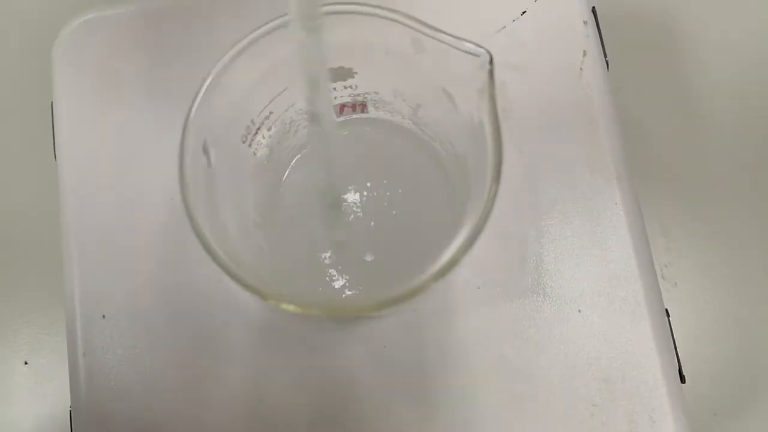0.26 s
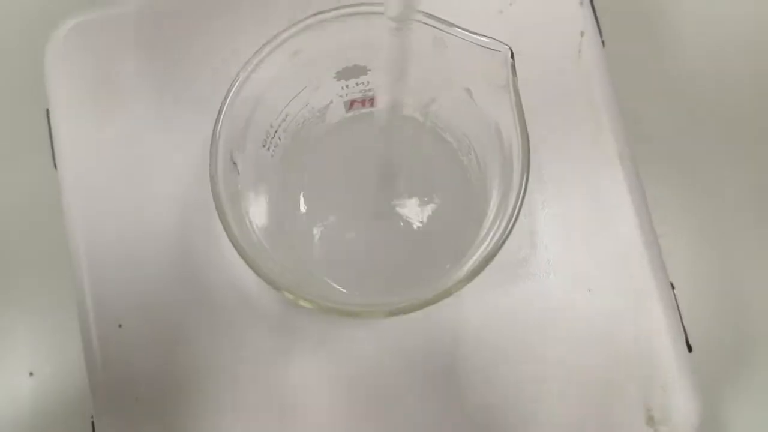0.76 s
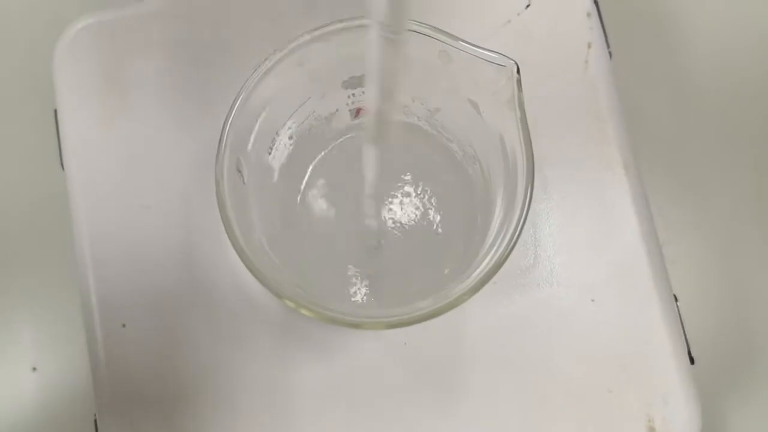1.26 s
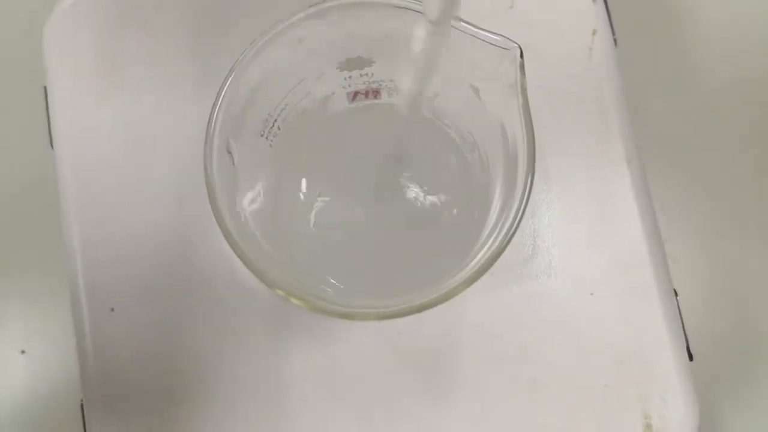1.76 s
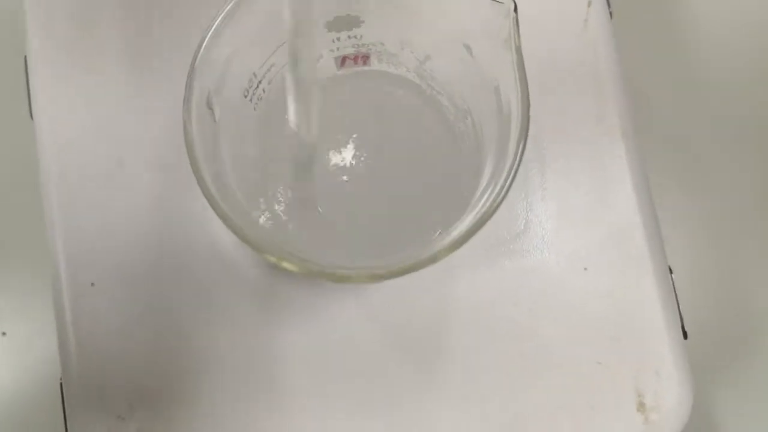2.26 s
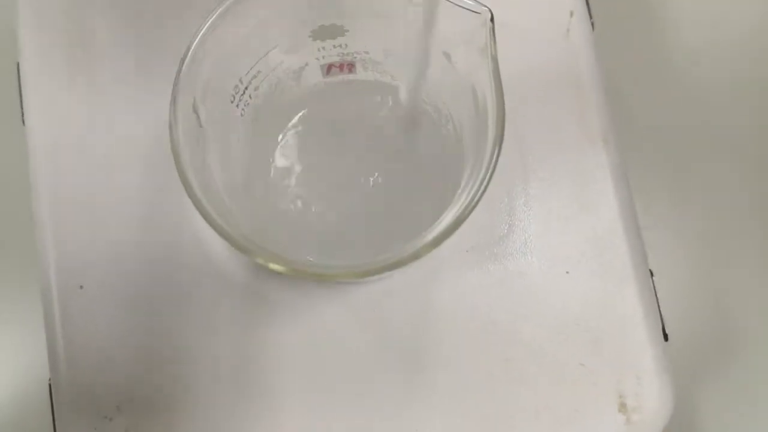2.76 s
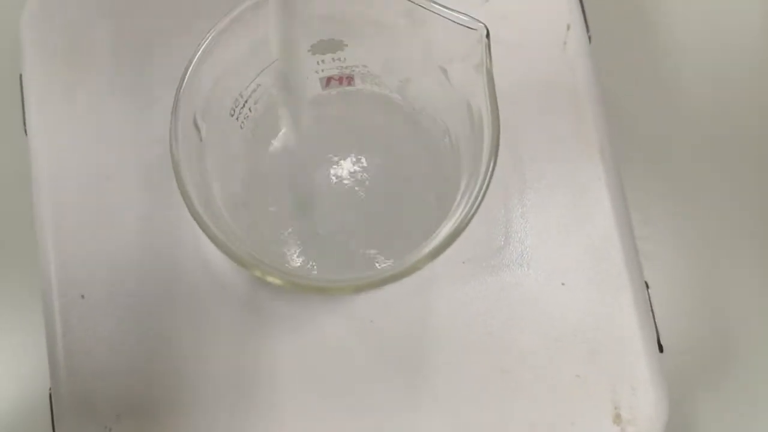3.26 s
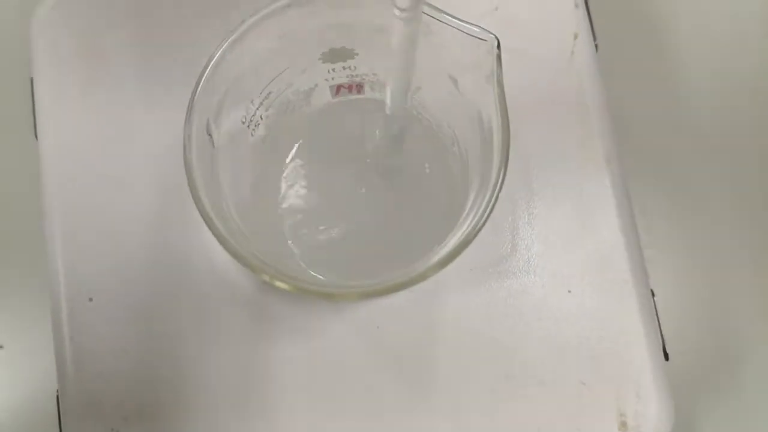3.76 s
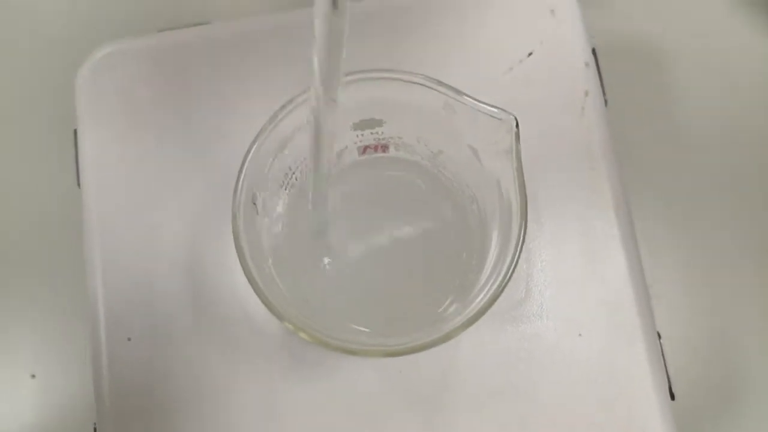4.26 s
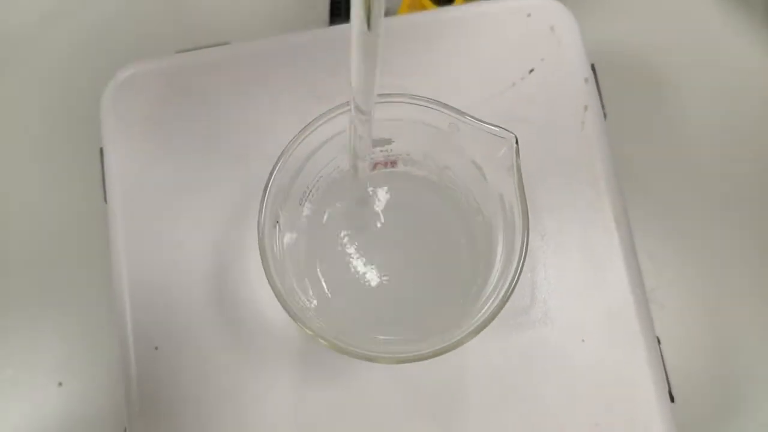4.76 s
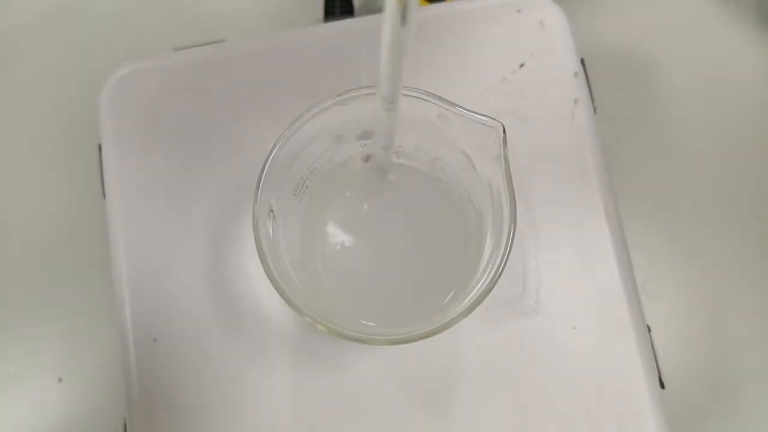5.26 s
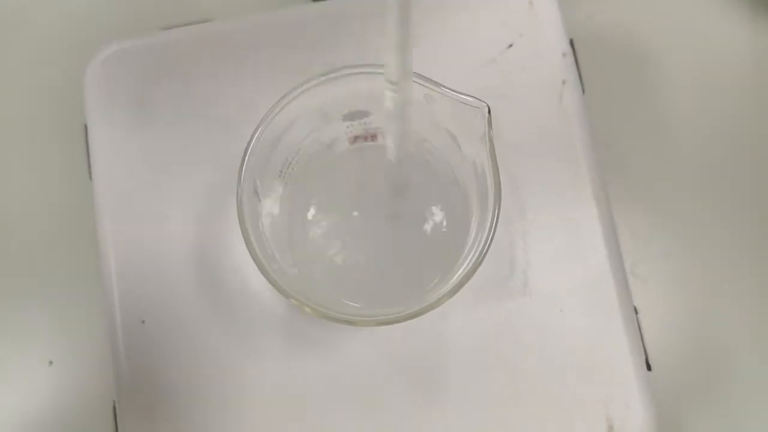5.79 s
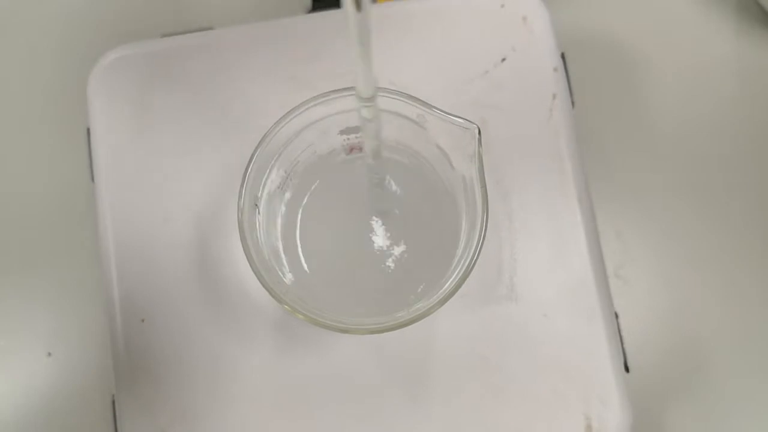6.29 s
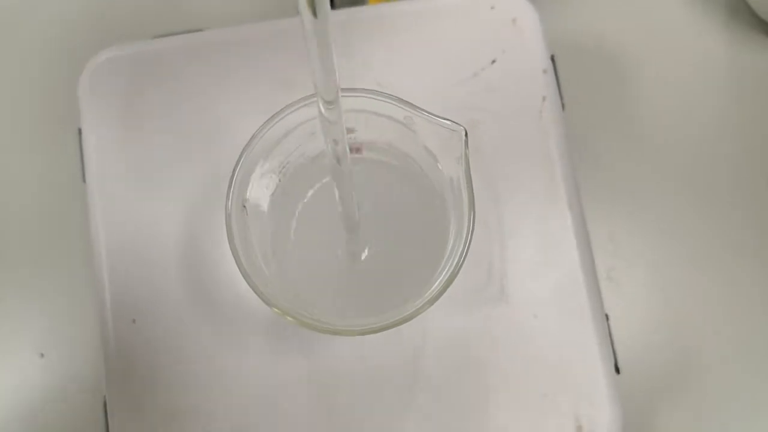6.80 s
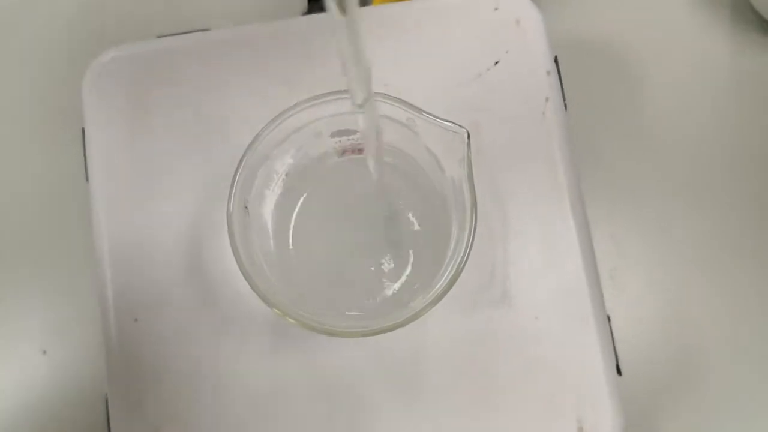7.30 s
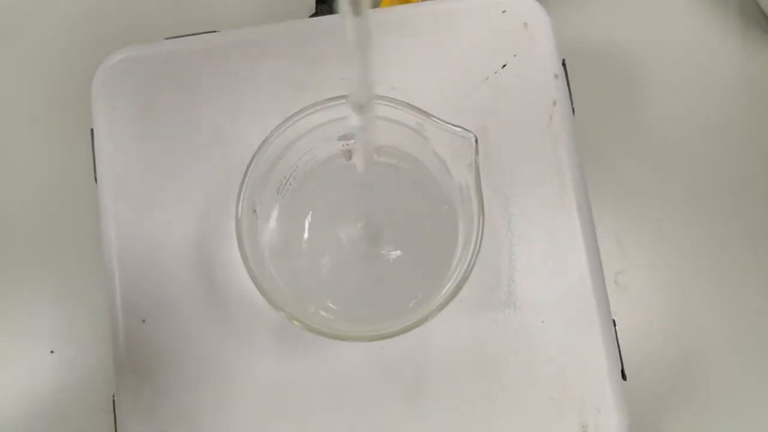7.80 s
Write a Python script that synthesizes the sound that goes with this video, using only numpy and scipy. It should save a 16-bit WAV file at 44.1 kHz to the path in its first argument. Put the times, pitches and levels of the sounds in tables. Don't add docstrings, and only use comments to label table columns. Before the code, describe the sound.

A steady low electrical hum, with rumble and a soft fan rush, runs throughout in a small hard room. Close to a hand-held phone, a glass rod stirs water in a glass beaker. At 0.34 s comes a loud, bright clink with a tiny bounce and short ring, followed by faint ticks and taps. Around 1.3 s there are light gritty strokes, then a hard, stuttering skid at 1.5 s. Small tinks follow until a softer clink at 3.06 s rings a little longer and bounces. A very short scrape chatters near 3.8 s. Another strong clink with quick bounces hits at 4.6 s; light touches continue. A medium clink sounds at 6.26 s, a longer grating skid runs from 6.7 to 6.8 s, and a sharp loud clink lands at 7.65 s. Faint dull taps end it near 8 s, the hum unchanged.

```python
import sys
import numpy as np
from scipy import signal
from scipy.fft import rfft, irfft, next_fast_len
from scipy.io import wavfile
from scipy.ndimage import uniform_filter1d, map_coordinates

SR = 44100
rng = np.random.default_rng(int(sys.argv[2]) if len(sys.argv) > 2 else 0)


def dump(signal):
    limited = np.clip(np.atleast_2d(signal).T, -1, 1)
    pcm = np.round(limited * 32767).astype(np.int16)
    wavfile.write(sys.argv[1], SR, pcm)


def linear_from_db(decibels):
    return 10 ** (np.asarray(decibels, float) / 20)


N = 354563

# [f/Hz, level/dB, time to fall 60 dB/s]
GLASS = [(1159, 6, 0.012), (1557, -0.5, 0.03), (1800, 4.5, 0.015), (2095, -3, 0.026), (2335, -2, 0.022),
         (2450, -14.5, 0.013), (2900, -1.5, 0.012), (3390, -5.5, 0.009), (3650, -17, 0.022),
         (3976, -5.5, 0.025), (4540, -6, 0.016), (5300, -18.5, 0.017), (5400, -24, 0.01), (6040, -6, 0.028),
         (6440, 1, 0.025), (7136, -6.5, 0.021), (7320, -4.5, 0.018), (7930, 0.5, 0.011),
         (8400, -4.5, 0.019), (9200, -5.5, 0.0059), (9560, 7, 0.0072), (10800, -23, 0.0045),
         (12500, -13.5, 0.0055), (13820, -7, 0.0098), (14860, -12.5, .01)]


def unit(x):
    return x / np.sqrt(np.mean(x ** 2) + 1e-20)


def along(points, hz):
    f, v = np.transpose(points)
    return np.interp(np.log(hz + 1), np.log(f + 1), v)


def latest(rows, s):
    return [row[1:] for row in rows if row[0] < s][-1]


def wobble(rate, size=N):
    knots = rng.standard_normal(int(size * rate / SR) + 4)
    return map_coordinates(knots, [np.arange(size) * rate / SR])


def filtered(x, response):
    m = next_fast_len(N + SR // 2)
    return irfft(rfft(x, m) * response(np.fft.rfftfreq(m, 1 / SR)), m)[..., :N]


def resonances(modes):
    def response(f):
        total = 0
        for k, (centre, width, db) in enumerate(modes):
            total = total + (-1) ** k * linear_from_db(db) * 1j * f * width / (centre ** 2 - f * f + 1j * f * width)
        return total
    return response


def unit_gain(response):
    return np.sqrt(np.mean(abs(response(np.arange(0, SR / 2))) ** 2))


def rush(spectrum):
    # [f/Hz, likeness from -1 to 1]
    alike = [(40, 1), (100, 0.99), (230, 0.93), (400, -0.12), (700, -0.45), (1200, 0.013), (2000, -0.047)]

    def middle_and_side(hz):
        turn = np.arccos(np.clip(along(alike, hz), -1, 1)) / 2
        return linear_from_db(along(spectrum, hz)) * [np.cos(turn), np.sin(turn)]
    mid, side = filtered(rng.standard_normal((2, N)), middle_and_side)
    return unit(np.array([mid + side, mid - side]))


def machines():
    hum_hz = [200.158, 100.08, 194.9, 205.4, 176.2, 224.1, 24, 248, 276]
    hum_db = [0, -27, -20, -29, -26, -17, -30, -35, -34]
    # [f/Hz, level/dB]
    whines = [(403.7, -80), (710.6, -70.5), (812.9, -76.5), (904.4, -70), (1174, -68), (1427, -74.5),
              (1712, -73), (2848, -75)]
    # [f/Hz, width/Hz, level/dB]
    housing = [(877, 82, -3), (1180, 64, 0), (1770, 90, -3.5), (2060, 80, -5.5), (2480, 140, -3.5)]
    # [f/Hz, level per Hz/dB]
    rumble = [(15, -23.5), (36, -3.5), (43, -32.5), (55, -0.5), (68, -5), (76, -24.5), (87, -18),
              (100, -17), (113, -18), (123, -8), (146, -9), (165, -7), (190, -24), (216, -10.5),
              (240, -24.5), (300, -72)]
    # [f/Hz, level per Hz/dB]
    fan = [(140, -39.5), (235, -3.5), (276, 0), (327, -6), (461, -9.5), (664, -14), (687, -16),
           (874, -11.5), (1350, -14.5), (1750, -13), (2830, -18), (3600, -28.5), (4680, -56.5),
           (7920, -120)]
    # [f/Hz, level per Hz/dB]
    air = [(2120, -23), (3600, -0.5), (4590, -3), (5750, -2), (6390, -7), (7610, -1.5), (9240, -16.5),
           (9710, -15), (11600, -28), (14900, -17.5), (16000, -18.5)]

    t = np.arange(N) / SR
    lead = np.array([[.09], [-.09]])
    out = np.zeros((2, N))
    for hz, db in zip(hum_hz, hum_db):
        out += linear_from_db(db - 33.0) * np.sqrt(2) * np.sin(2 * np.pi * (hz * t + rng.random()) + lead)
    for hz, db in whines:
        level = linear_from_db(db + 2 + 2.8 * wobble(5.2))
        turns = hz * t + 0.072 * wobble(9) + rng.random()
        out += level * np.sin(2 * np.pi * turns + 8.9 * lead)
    out += linear_from_db(-59 + 1.5 * wobble(7)) * unit(filtered(rng.standard_normal((2, N)), resonances(housing)))
    swell = wobble(2.55)
    out += linear_from_db(-41.5 + 0.66 * wobble(3.8)) * rush(rumble)
    out += linear_from_db(-50 + .5 * swell) * rush(fan)
    return out + linear_from_db(-64.5 + 0.67 * swell) * rush(air)


def ringing(modes_hz, db, t60, rise, spread_db, seconds):
    # [f/Hz, left minus right/dB]
    facing = [(1200, -2.5), (1700, -2.5), (3000, 5), (6000, 0), (8000, 0.5), (10000, -16), (14000, -4)]
    t = np.arange(round(seconds * SR)) / SR
    hz, db, t60, rise = [np.reshape(v, (-1, 1)) for v in (modes_hz, db, t60, rise)]
    luck = rng.standard_normal((5, len(hz), 1))
    pitch = hz * (1 + 0.0047 * luck[0])
    fade = linear_from_db(db + spread_db * luck[1] - 60 * t / t60) * (1 - np.exp(-t / rise))
    side = np.array([1, -1])[:, None, None]
    apart = 0.97 * np.clip(hz / 3000, 0, 1) * luck[2]
    seen = linear_from_db(side * (along(facing, hz) / 2 + 3.6 * luck[3]))
    waves = np.sin(2 * np.pi * pitch * t + side * apart + 3 * luck[4])
    return (seen * fade * waves).sum(1)


def snap(t60, seconds, low_hz=2000):
    t = np.arange(round(seconds * SR)) / SR
    burst = rng.standard_normal(len(t)) + 0.78 * rng.standard_normal((2, len(t)))
    band = signal.butter(5, [low_hz, 10500], "band", fs=SR, output="sos")
    return signal.sosfilt(band, burst) * linear_from_db(-60 * t / t60) * (1 - np.exp(-t / .0008))


def ticks():
    # [t/s, peak
    # level/dB, bright f/Hz, dull level/dB, dull f/Hz]
    tinks = [(.134, -53, 6950, -9, 1700), (0.392, -33.5, 6390, -16, 1850), (0.552, -48.5, 8130, 9, 1600),
             (1.6693, -35, 6050, -3, 1720), (1.824, -50, 7600, -2, 1800), (2.066, -40.5, 7600, -5, 1560),
             (2.899, -37.5, 7560, -21, 1950), (2.906, -39.5, 7700, -14, 1370),
             (2.929, -53, 9460, -15, 1900), (3.2722, -50, 5400, 2, 1640), (3.483, -37, 7270, -12, 1200),
             (3.8953, -31, 8160, -10, 1600), (3.914, -42.5, 7700, -10, 1700), (4.884, -44, 7630, -9, 1250),
             (5.438, -44, 9300, -11, 1780), (5.9342, -45, 7600, 2.5, 1600), (6.007, -59, 7400, 11.5, 1560),
             (6.1392, -53, 7600, -14, 1800), (6.38, -44, 7600, -17, 1770), (6.6016, -34, 5800, -2, 1610),
             (7.2454, -51, 4080, 2, 1880), (7.729, -38, 8000, -3, 1630), (7.88, -52.5, 7800, 2, 1750),
             (4.895, -46.5, 9400, -9, 1260), (7.73, -50, 11100, -20, 3480), (7.666, -34, 5450, -17, 2900),
             (5.9344, -51.5, 10000, -10, 1750), (4.6015, -14, 7350, -36, 2300),
             (3.482, -42, 3590, -9, 1700), (6.249, -50, 7600, -14, 3500), (6.277, -36, 8000, -6, 2200),
             (4.886, -50, 11000, -6, 1750), (3.896, -42, 3450, -6, 1200)]
    # [t/s, peak level/dB, dull level/dB, dull f/Hz]
    taps = [(0.4488, -36.5, -7.5, 1880), (0.702, -49, -3, 1180), (1.467, -58, 15, 1250),
            (1.689, -65, 3, 1750), (1.735, -61.5, 14.5, 1710), (2.367, -50.5, 4, 1500),
            (3.657, -49, 5, 1420), (4.2034, -45, -8, 1200), (4.2346, -49, 4, 1570),
            (4.855, -43.5, -6, 1050), (6.1386, -36.5, -19, 1800), (6.6008, -35.5, -2, 1840),
            (6.614, -53, 17, 1700), (6.91, -58.5, 15, 1550), (7.47, -46, -17, 1180),
            (7.987, -44.5, 1, 1110), (7.99, -52, 8, 2090), (7.996, -58, 16, 1170), (8.008, -62, 12, 1210)]
    tap_hz, bottom_hz = 3280, 3500
    tink_spread, tap_spread = 0.94, 1.7

    out = np.zeros((2, N + SR))
    hz, level_db, t60 = np.transpose(GLASS[6:])
    touches = [row + (tink_spread,) for row in tinks]
    touches += [(s, db, tap_hz, *dull, tap_spread) for s, db, *dull in taps]
    for s, db, bright_hz, dull_db, dull_hz, spread in touches:
        octaves = np.log2(hz / bright_hz) / spread
        near_db = -np.where(octaves > 0, 32, 5) * octaves ** 2
        sound = ringing(hz, near_db - 15.0, 0.83 * t60, 4.4 / hz, 1.8, seconds=.1)
        sound += ringing([bright_hz, dull_hz, 1.2 * dull_hz, bottom_hz],
                         [-2 - 4.0 * spread, dull_db + 2.5, dull_db - 6, -19],
                         t60=[0.012, 0.035, 0.02, 0.028], rise=[0.00025, 0.00089, 0.0012, .0008],
                         spread_db=0.54, seconds=.1)
        sound += linear_from_db(-7) * min(spread, 1.3) * snap(0.0067, seconds=.1, low_hz=1200)
        out[:, round((s - .0007) * SR):][:, :sound.shape[1]] += linear_from_db(db + 5.5) * sound
    return out[:, :N]


def clinks():
    # [t/s, peak level/dB, knock level/dB, bowl ring level/dB, rim ring level/dB]
    blows = [(0.3381, -8, -0.5, -5, -24), (0.351, -29, 16, -11, -25), (3.0644, -20, -3, -3, -11.5),
             (3.0781, -34.5, 1, 10, -12), (4.602, -10, 0, -11, -17.5), (4.609, -19, 8, -0.5, -47),
             (4.625, -36, 17, 15.5, -1.5), (6.2616, -16, -2.5, -8.5, -6), (6.2705, -24, 7, -9, -8),
             (7.647, -9.5, -2.5, -4.5, -15), (7.666, -26, 2.5, -14, -5)]
    # [f/Hz, level/dB, time to fall 60 dB/s, rise/s]
    bowl = [(1660, -0.5, 0.071, 0.0068), (1750, -6.5, 0.082, 0.0027), (1720, -25, 0.26, .004),
            (1663, -30.5, .4, 0.0036), (1640, -12.5, 0.1, .003)]
    # [f/Hz, level/dB, time to fall 60 dB/s, rise/s]
    rim = [(4590, -0.5, 0.062, .001), (4500, -26.5, 0.4, 0.0011), (4670, -24, .33, .001),
           (4700, -24, 0.25, .001), (4740, -13.5, 0.083, .001)]
    # [f/Hz, level/dB, time to fall 60 dB/s, rise/s]
    plate = [(434, -1, 0.059, 0.0023), (645, 2, 0.028, 0.0023)]
    # [from t/s, level/dB near 2.3, 3.2, 4 and 7.3 kHz]
    spots = [(.3, 4.5, -6.5, -3, -0.5), (3, -21, 8, 2.5, -4), (4.5, 1.5, -1.5, 1.5, 8.5),
             (6.2, 0.5, -0.5, -1, -5.5), (7.6, -0.5, 1.5, 1.5, -6)]
    # [from t/s, level/dB near 6.4, 9.7 and 13 kHz]
    sheens = [(.3, -3.5, 4.5, -4.5), (3, 1.5, 1, 10), (4.5, 2, -4, 8), (6.2, -6, -6.5, 4),
              (7.6, -0.5, 0.5, -6.5)]
    # [from t/s, level/dB]
    lasts = [(.3, -2), (3, 6), (4.5, 1), (6.2, 0), (7.6, 1)]
    top_level_db, top_loss = -12, 1.3

    out, snaps = np.zeros((2, 2, N + SR))
    hz, level_db, t60 = np.transpose(GLASS)
    bowl_hz, mode_db, bowl_t60, bowl_rise = np.transpose(bowl)
    half = SR // 2
    slosh_db = np.minimum(np.arange(half) / SR * 120, 6)
    for s, db, knock_db, bowl_db, rim_db in blows:
        top_db = top_level_db - top_loss * max(knock_db, 0)
        low_db, mid_db, upper_db, high_db = latest(spots, s)
        sheen_db, shine_db, glint_db = latest(sheens, s)
        blow_db = along([(2500, knock_db - 4.5), (3000, -2.0), (8800, -2.0), (9300, top_db)], hz)
        spot_db = along([(1900, 0.0093), (2300, low_db), (3200, mid_db), (4000, upper_db),
                         (5300, 0.0023), (6400, sheen_db), (7250, high_db), (7900, shine_db),
                         (9700, shine_db), (12000, glint_db)], hz)
        cluster = ringing(hz, level_db + blow_db + spot_db, t60, 5 / hz, 1.1, seconds=.1)
        sound = np.pad(cluster, [(0, 0), (0, half - cluster.shape[1])])

        bowl_flutter = linear_from_db(.9 * slosh_db * wobble(170, size=half))
        rim_flutter = linear_from_db(.6 * slosh_db * wobble(260, size=half))
        lasts_db = latest(lasts, s)[0] * (bowl_t60 > .2)
        bowl_ring = ringing(bowl_hz, mode_db + lasts_db, bowl_t60, bowl_rise, 0.45, seconds=.5)
        sound += linear_from_db(bowl_db + 3.0) * bowl_flutter * bowl_ring
        sound += linear_from_db(rim_db + 3.0) * rim_flutter * ringing(*np.transpose(rim), .5, seconds=.5)
        sound += linear_from_db(knock_db - 27.0) * ringing(*np.transpose(plate), 0.93, seconds=.5)
        start = round((s - .0008) * SR)
        out[:, start:][:, :half] += linear_from_db(db - 0.5) * sound
        snaps[:, start:][:, :half] += linear_from_db(db - 1.5) * snap(0.014, seconds=.5)
    return out[:, :N], snaps[:, :N]


def contact(rows, fall_s):
    out = np.zeros((2, N))
    for start, rise, hold, level_db, extra_db in rows:
        corners = np.cumsum([0, rise, hold, fall_s])
        t = np.arange(round(corners[-1] * SR)) / SR
        shape = np.interp(t, corners, [0, 1, 1, 0]) ** 1.2
        out[:, round(start * SR):][:, :len(shape)] += linear_from_db([[level_db], [level_db + extra_db]]) * shape
    return out


def drags():
    # [start t/s, rise/s, hold/s, hiss level/dB, squeak over hiss/dB]
    strokes = [(1.29, .06, 0.036, -64.5, 5.5), (1.41, 0.065, 0.032, -69, 18.5),
               (3.63, 0.027, 0.016, -70, 10.5), (3.67, 0.045, .02, -65.5, 1), (5.37, .06, 0.011, -64.5, -1),
               (5.43, 0.03, .03, -79.5, 24.5), (4.24, .04, 0.086, -74, 11.5), (6.9, .02, 0.056, -69.5, 14),
               (7.15, 0.064, 0.12, -67.5, 11.5)]
    # [f/Hz, width/Hz, level/dB]
    wet = [(5300, 500, 1.5), (5960, 400, 2), (7600, 380, 4), (8900, 300, -6), (10000, 110, -10)]
    # [f/Hz, width/Hz, level/dB]
    squeaky = [(1775, 46, 10), (1600, 150, -5.5)]

    def grit(modes):
        grains = rng.standard_normal((2, N)) * linear_from_db(2.4 * wobble(180))
        return unit(filtered(grains, resonances(modes)))
    hiss, squeak = contact(strokes, fall_s=0.044)
    return hiss * grit(wet) + squeak * grit(squeaky)


def skids():
    # [start t/s, rise/s, hold/s, level/dB, brightness/dB]
    pushes = [(1.515, 0.0047, 0.0069, -8, -3), (1.531, 0.0036, 0.019, -17, -1.5),
              (1.555, 0.0037, 0.0046, -16, -4.5), (1.566, 0.0038, 0.008, -26.5, -3.5),
              (3.756, 0.007, 0.008, -33, 7), (3.768, 0.021, 0.0074, -22.5, 2.5),
              (3.801, 0.0015, 0.002, -33, 5), (6.682, 0.023, 0.0077, -19, -3.5),
              (6.71, 0.017, 0.023, -14.5, 0), (6.765, 0.003, 0.0022, -24.5, 3),
              (6.778, 0.011, 0.0073, -21.5, 0.5), (6.804, 0.0067, 0.0079, -24.5, -2.5)]
    # [t/s, peak level/dB]
    slips = [(1.5186, -6.5), (1.5249, -4.5), (1.5315, -15.5), (1.5319, -11), (1.5357, -12.5), (1.5396, -14),
             (1.5421, -4.5), (1.5515, -11), (1.5562, -14), (1.5563, -14.5), (1.5626, -33), (1.573, -20),
             (1.576, -19), (3.7688, -37), (3.7745, -23), (3.7787, -17), (3.7818, -12.5), (3.781, -32),
             (3.7875, -6), (3.794, -9.5), (3.7959, -16), (3.7984, -19.5), (3.8044, -18.5), (3.805, -21),
             (6.6979, -22.5), (6.6995, -26), (6.7014, -16.5), (6.7066, -11), (6.709, -11.5),
             (6.7117, -13.5), (6.7139, -10.5), (6.7191, -16), (6.7231, -18.5), (6.7256, -15), (6.729, -23),
             (6.7328, -14.5), (6.733, -31), (6.7365, -14.5), (6.7437, -17), (6.7436, -6), (6.7455, -20),
             (6.7512, -14), (6.755, -22), (6.764, -15), (6.7687, -5), (6.7756, -28), (6.782, -17),
             (6.7883, -20), (6.7919, -11.5), (6.7946, -13), (6.798, -23), (6.804, -20), (6.813, -20.5),
             (6.8168, -17.5), (6.818, -18), (6.8225, -28)]
    # [t/s, free bowl ring level/dB, plate thud level/dB, foot level/dB]
    places = [(1.55, -21, -20.5, -2), (3.765, -28, -22, 8), (3.79, -26, -21.5, -6), (6.7, -22, -22, -4),
              (6.8, -24.5, -15, -2)]
    # [from t/s, to t/s]
    spans = [
        (1.4, 2),
        (3.6, 4),
        (6.5, 7),
    ]
    # [f/Hz, width/Hz, level/dB]
    body_1 = [(1370, 40, -17), (1543, 42, -1), (1750, 45, -7.5), (1986, 83, -0.5), (2234, 23, -16),
              (2650, 33, -9.5), (1950, 980, -6)]
    body_2 = [(924, 46, -14), (1255, 24, -8.5), (1400, 45, -10), (1550, 70, 1), (1860, 44, -11),
              (2030, 40, -8), (2100, 57, -16), (2480, 50, -9), (1900, 870, -9.5)]
    body_3 = [(1370, 50, -16), (1623, 52, -1), (1770, 43, -2.5), (2000, 58, -8.5), (2200, 40, -14),
              (2350, 50, -11), (2780, 80, -11), (1950, 920, -7.5)]
    # [f/Hz, width/Hz, level/dB]
    middle_1 = [(3120, 60, 0), (3320, 120, 0.5), (3600, 220, -6), (3890, 120, -7.5)]
    middle_2 = [(3290, 93, -2.5), (3480, 70, 3), (3620, 150, -8), (3990, 60, -4.5)]
    middle_3 = [(3170, 130, -2), (3450, 160, 1), (3970, 110, -8.5), (4860, 230, -10.5)]
    # [f/Hz, width/Hz, level/dB]
    foot = [(1036, 36, -5.5), (1200, 45, 2.5), (1413, 83, -9.5)]
    # [f/Hz, width/Hz, level/dB]
    bowl_ring = [(1680, 3.6, 1), (1700, 6, -1.5), (1750, 8, -1.5), (1630, 9, -6.5)]
    # [f/Hz, width/Hz, level/dB]
    plate_thud = [(402, 45, -7), (440, 28, -1)]
    # [f/Hz, width/Hz, level/dB]
    gritty = [(4400, 370, -9.5), (5380, 410, -2), (5930, 190, 0.5), (7600, 520, -5.5), (8560, 330, -18),
              (9240, 900, -37), (9960, 200, -12), (11020, 160, -13)]
    # [f/Hz, lead/radians]
    turn = [(1000, 0.59), (1700, 0.61), (2200, 1.58), (3000, 2.1), (4500, 4), (6000, 1.1)]
    body_db, middle_db = [1.5, 0.5, 0], [-2, -0.5, 1]
    jolt_s = .00025

    press, bright = contact(pushes, fall_s=0.01)
    t = np.arange(N) / SR
    place_s, *place_db = np.transpose(places)
    free, thud, base = [press * linear_from_db(np.interp(t, place_s, db)) for db in place_db]
    slip_s, slip_db = np.transpose(slips)
    at = np.round(slip_s * SR).astype(int)
    side = np.array([[.5], [-.5]])
    during = [(t > a) & (t < b) for a, b in spans]
    bodies = [(modes, linear_from_db(db) * on * press)
              for modes, db, on in zip((body_1, body_2, body_3), body_db, during)]
    middles = [(modes, linear_from_db(db - 12) * on * bright)
               for modes, db, on in zip((middle_1, middle_2, middle_3), middle_db, during)]
    # (parts, shared grit, grit of each port, softness Hz, left-right dB, whether the tip gives)
    groups = [(bodies, .16, .1, 2900, -3, True),
              ([(foot, linear_from_db(-9.5) * base)], .4, .3, 2900, -3, True),
              ([(bowl_ring, free)], .5, .4, 2200, -3, False),
              ([(plate_thud, thud)], .5, .2, 700, .3, False),
              (middles, .5, .3, 4600, 3, False),
              ([(gritty, linear_from_db(-27.5) * bright)], .8, .6, 10500, 3, False)]
    out = np.zeros((2, N))
    for parts, grit, own, soft_hz, pan_db, gives in groups:
        noise = rng.standard_normal((3, N))
        jolts = np.zeros(N)
        jolts[at] = linear_from_db(slip_db + 10.5 + 1.8 * noise[0, at]) / (press[at] + 0.0045)
        if gives:
            jolts = np.convolve(jolts, np.hanning(round(jolt_s * SR)) * 2 / (jolt_s * SR), "same")
        drive = jolts + grit * noise[0] + own * noise[1:]
        for modes, level in parts:
            def shape(f):
                soft = 1 / (1 + 1.4j * f / soft_hz - (f / soft_hz) ** 2) ** 2
                thin = 1j * f / (modes[0][0] + 1j * f)
                return resonances(modes)(f) * soft * thin

            def ports(f):
                return shape(f) * linear_from_db(side * pan_db) * np.exp(1j * side * along(turn, f))
            out += filtered(drive * level, ports) / unit_gain(shape)
    return linear_from_db(3.5) * out


def room(x):
    # [f/Hz, time to fall 60 dB/s]
    echo_t60 = [(500, 0.32), (1700, 0.56), (5000, 0.26), (10000, 0.3), (15000, 0.3)]
    out, step = np.zeros((2, N + SR)), SR // 3
    for a in range(0, N, step):
        hz, t, z = signal.stft(rng.standard_normal((2, SR // 2)), SR, nperseg=256)
        fading = z * linear_from_db(-60 * t / along(echo_t60, hz)[:, None])
        tail = signal.istft(fading, SR, nperseg=256)[1]
        wet = signal.fftconvolve(x[:, a:a + step], tail / np.linalg.norm(tail[0]), axes=1)
        out[:, a + 350:][:, :wet.shape[1]] += wet
    return out[:, :N]


def scene():
    # [f/Hz, width/Hz, level/dB]
    linger = [(2200, 740, -5), (6400, 600, -1), (7600, 900, -3), (8400, 400, -6), (9800, 900, 2)]

    def echo_colour(hz):
        return (1.1 + abs(resonances(linger)(hz))) / (1 + (hz / 10400) ** 40)
    rings, snaps = clinks()
    touches = ticks()
    rubs = skids() + drags()
    echo = room(linear_from_db(-29) * rings + linear_from_db(-11) * snaps + linear_from_db(-17) * touches + linear_from_db(-25.5) * rubs)
    return rings + snaps + touches + rubs + filtered(echo, echo_colour) + machines()


def roll_off(x):
    return signal.sosfilt(signal.butter(12, 15400, fs=SR, output="sos"), x)


def record(dry):
    # [f/Hz, left minus right/dB]
    port_db = [(150, 0.3), (350, -1.1), (700, 3), (1150, 0), (1650, -5.5), (2200, -4.5), (3000, -0.5),
               (4200, 4.5), (6000, 2.5), (8000, 7), (10500, -10), (13500, 0.5)]

    def ports(hz):
        tilt = linear_from_db(along(port_db, hz) * np.array([[.5], [-.5]]))
        return tilt / np.sqrt(1 + (hz / 15300) ** 40)
    x = filtered(dry, ports)
    loud_db = 10 * np.log10(abs(uniform_filter1d((x ** 2).max(0), size=441)) + 1e-12)
    recover_db = 22 * np.arange(N) / SR
    wanted_db = 0.25 * np.clip(loud_db + 26.0, 0, None)
    duck_db = np.maximum.accumulate(wanted_db + recover_db) - recover_db
    x = x * linear_from_db(-uniform_filter1d(duck_db, size=301))
    x = x / (1 + abs(x / .65) ** 4) ** (1 / 4)
    return roll_off(x)


dry = scene()
out = record(dry)
dump(out)
```